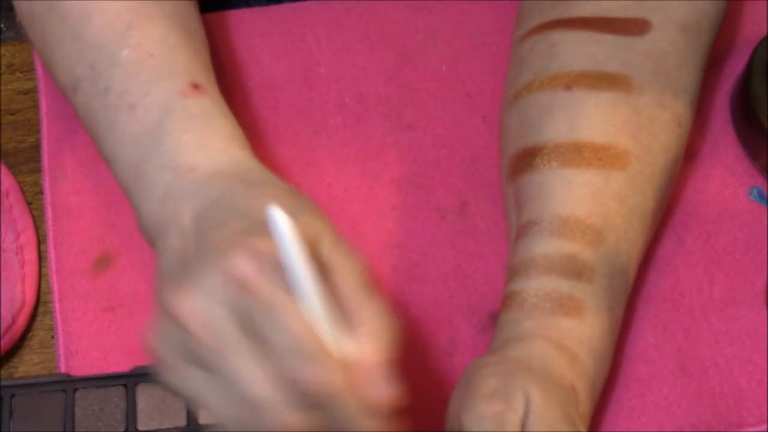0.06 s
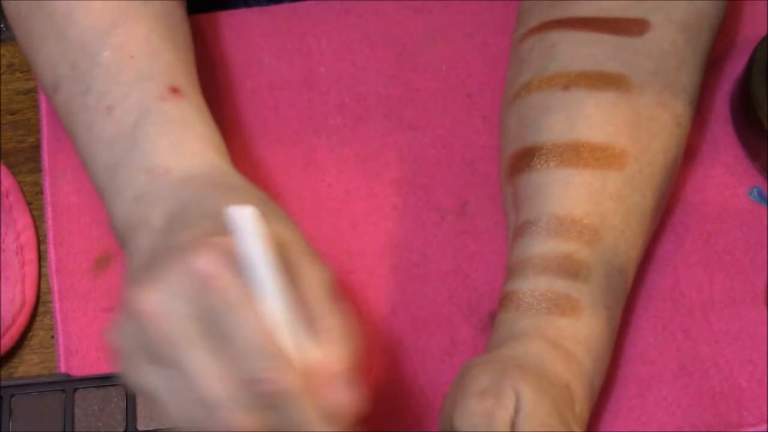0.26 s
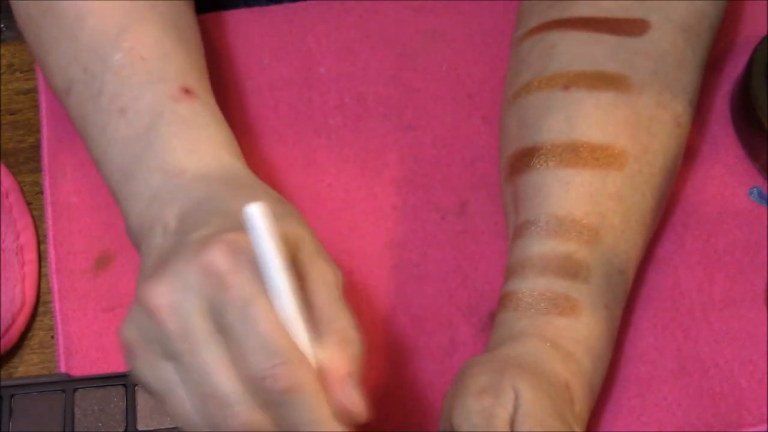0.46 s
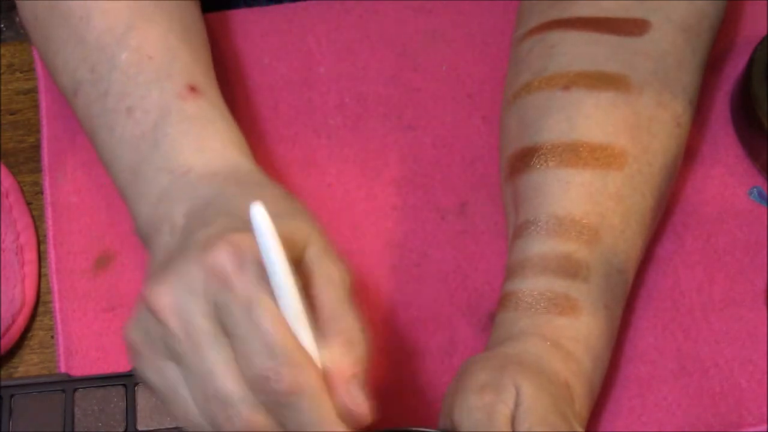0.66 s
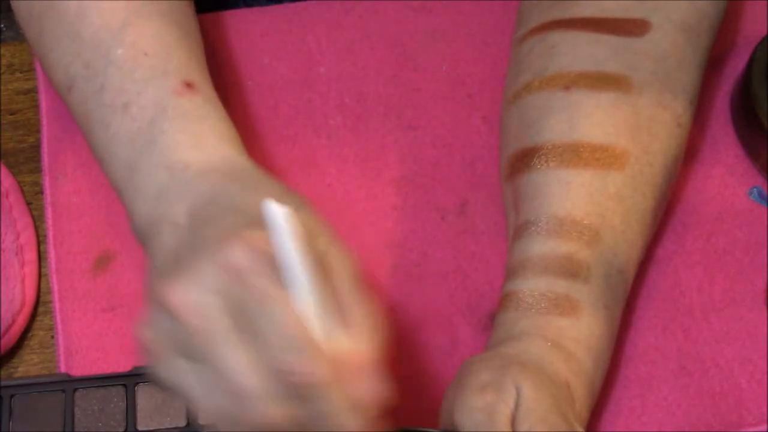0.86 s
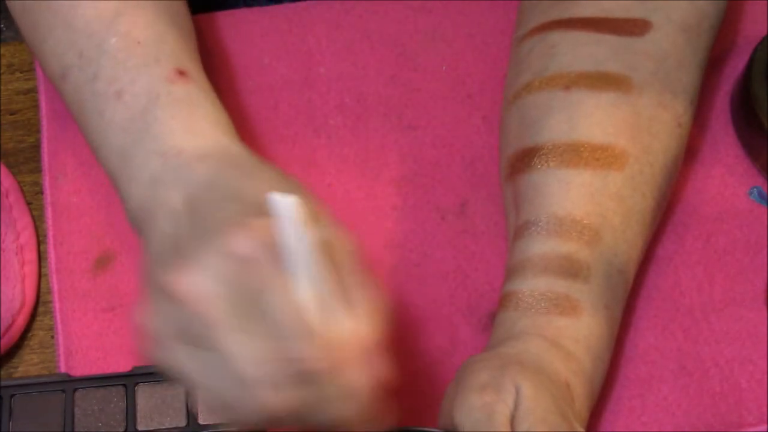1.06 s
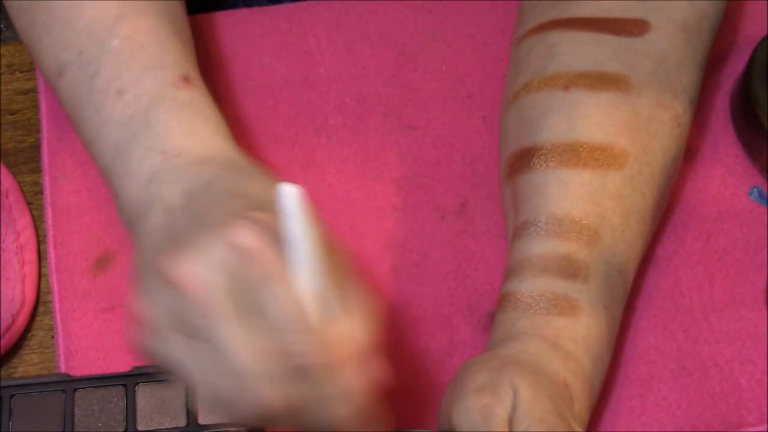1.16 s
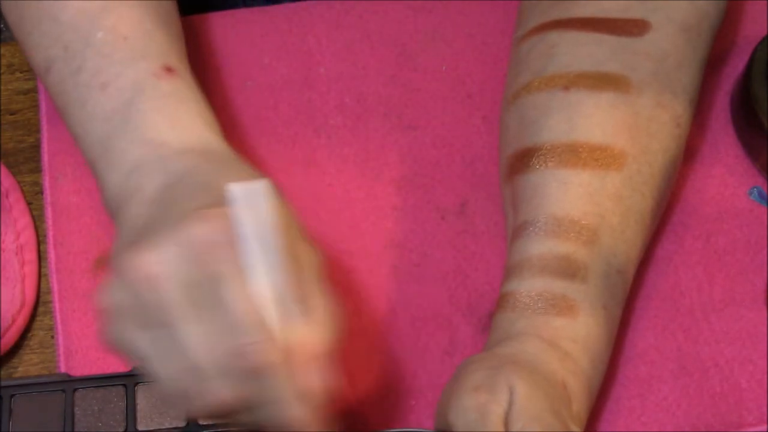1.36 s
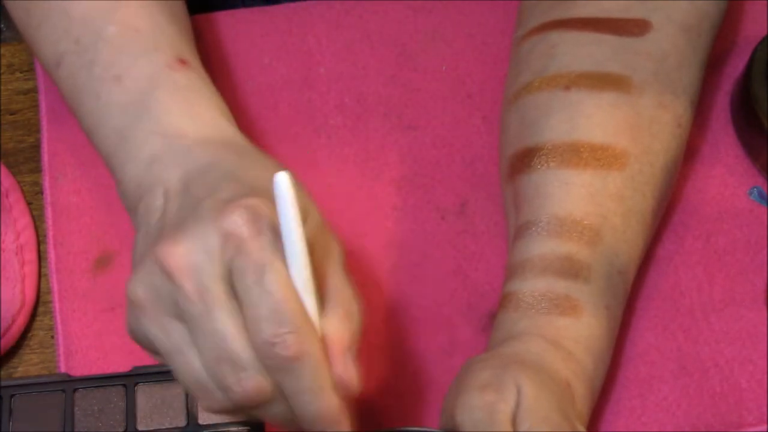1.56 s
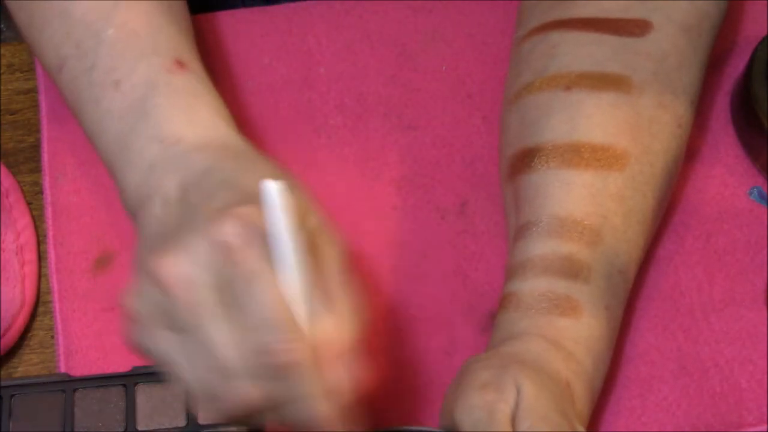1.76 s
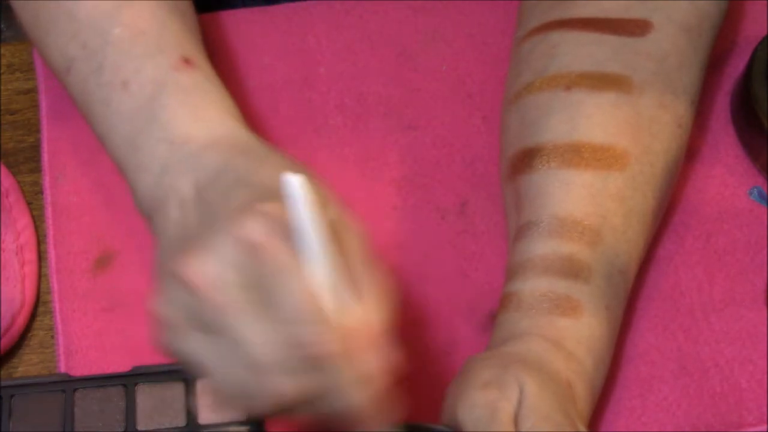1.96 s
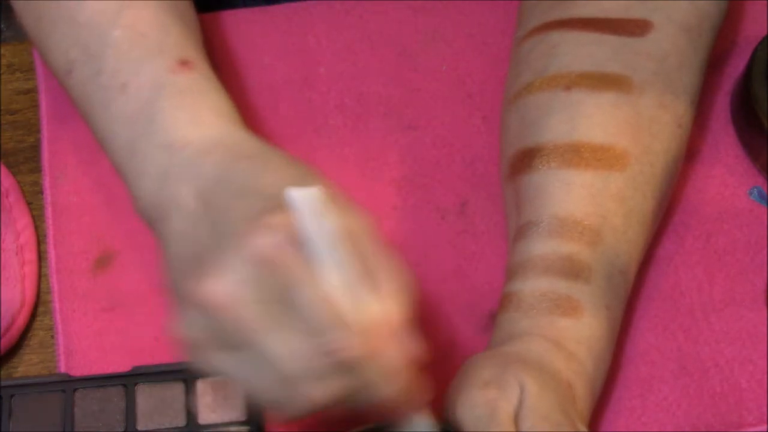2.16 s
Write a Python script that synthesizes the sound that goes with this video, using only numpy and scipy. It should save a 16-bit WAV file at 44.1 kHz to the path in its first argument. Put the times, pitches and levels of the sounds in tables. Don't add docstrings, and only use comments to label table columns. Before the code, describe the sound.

Close up, steady rapid brush swishes, about nine a second, are broken by several short, hard knocks on a plastic palette; a fridge-like hum and faint fan sit behind in a small, fairly dry room.

```python
import sys
import numpy as np
from scipy import signal
from scipy.fft import rfft, irfft
from scipy.io import wavfile
from scipy.ndimage import uniform_filter1d

SR = 44100
rng = np.random.default_rng(int(sys.argv[2]) if len(sys.argv) > 2 else 0)


def gain_from_db(level_db):
    decades = np.asarray(level_db, float) / 20
    return 10 ** decades


def to_wav(s):
    ch = np.atleast_2d(s).T
    pcm = np.round(np.clip(ch, -1, 1) * 32767)
    wavfile.write(sys.argv[1], SR, pcm.astype(np.int16))


N = 97020
LEAD_S = 0.1

# pitch [Hz], level [dB rms], pitch waver [Hz].
HUM_TONES = [(120.1, -46.5, .05), (132.4, -54, .1), (146.6, -63, .6), (185.5, -63, .6), (240, -59, .1)]
# pitch [Hz], width [Hz], level [dB rms].
FAN_TONES = [(212.3, 8.9, -56), (401.1, 18.8, -57.5), (575.4, 30, -60.5), (725, 88, -57)]
# frequency [Hz], density [dB per Hz].
AIR_RUMBLE = [(15, -43), (50, -41), (70, -7), (105, 4), (230, 7), (330, 1), (750, -3), (1200, -42)]
# frequency [Hz], density [dB per Hz].
AIR_HISS = [(600, -0.5), (1100, 2), (1800, -6.5), (3000, -9.5), (5000, -17), (8000, -20), (15500, -28),
            (15900, -80)]
# frequency [Hz], left-right likeness [0-1].
AIR_LIKENESS = [(30, .93), (100, .999), (170, 1), (300, 0.92), (600, 0.93), (1650, 0.9), (4500, 0.78),
                (7500, .995)]
# frequency [Hz], t60 [s].
ROOM_DECAY = [(700, .25), (1500, 0.15), (3000, 0.18), (5000, 0.17), (8000, 0.08), (14000, 0.33)]
# frequency [Hz], level [dB].
ROOM_COLOUR = [(1300, -1), (2500, 5.5), (3500, 3), (4700, 2.5), (6300, 5), (8000, 9), (11000, -7.5),
               (15500, -23)]
# time [s], strength [dB].
EARLIER_KNOCK = (-0.025, -7)
# peak time [s], strength [dB], swell [s], hollow rub against hiss [dB].
SWEEPS = [(0.088, -48, 0.023, 1), (0.206, -51.5, 0.021, -0.5), (0.316, -48, 0.032, 0.5),
          (0.434, -52, 0.02, 2), (0.538, -47.5, 0.023, -1.5), (.66, -52, 0.028, -4), (0.763, -48, 0.025, 0),
          (0.883, -50, 0.031, -1.5), (0.983, -48.5, 0.025, 2), (1.092, -50, 0.03, -2),
          (1.221, -50, 0.051, -1), (1.315, -54.5, 0.021, -14), (1.427, -46.5, 0.017, -1),
          (1.559, -53, 0.027, -4.5), (1.657, -49, 0.02, 0.5), (1.783, -52.5, 0.059, 0.5),
          (1.878, -49.5, 0.025, -2.5), (1.981, -52, 0.018, 3), (2.087, -47, 0.018, 1.5),
          (2.2, -56.5, 0.024, 2)]
# frequency [Hz], density [dB per Hz].
BRISTLE_HISS = [(1100, -18), (1900, -2.5), (4100, -9), (5500, -12.5), (7500, -9.5), (10000, -13),
                (15500, -25.5), (15900, -63)]
# pitch [Hz], width [Hz], level [dB].
BRISTLE_RESONANCES = [(7400, 500, -20), (9300, 600, -20), (4300, 600, -22)]
# start [s], strength [dB], spot [0 broad face - 1 rim],
# brightness [dB per octave], free ring before the hand damps it [s].
KNOCKS = [
    (0.2208, 2, 0.28, 0.5, 0.002),
    (0.6754, -1.5, 0, -0.5, 0.0018),
    (1.3298, 0, 0.25, 1.5, 0.0021),
    (1.4490, 1.5, 1, 2, 0.0014),
    (1.6755, 2, 1, 3, 0.00205),
    (1.8992, -11.5, 0.86, -2, 0.0014),
]
# pitch [Hz], level struck on the face [dB], level struck on the rim [dB], t60 [s].
PALETTE_MODES = [(864, -41, -39, 0.0027), (1342, -2, -5.5, 0.02), (1554, -2.5, -10, 0.016),
                 (2180, -1.5, 2.5, 0.016), (2654, -7, 2.5, 0.013), (2928, -1.5, -0.5, 0.0086),
                 (4193, -7.5, 0.5, 0.012), (4636, -3, 2, 0.011), (5394, -1, -6, 0.0096),
                 (6200, -5.5, -17, 0.005), (7140, -10.5, -6.5, 0.011), (8760, -8, -5.5, 0.0052),
                 (9590, -16, -16.5, 0.018), (10580, -20, -14, 0.0094)]
# delay [s], level [dB].
REFLECTIONS = [(.0045, -24), (.0075, -12), (.0105, -12), (.013, -17), (.017, -18)]


def evened(x):
    return x / np.sqrt(np.mean(x ** 2) + 1e-20)


def read(points, hz):
    f, value = np.transpose(points)
    return np.interp(np.log(hz + 1), np.log(f + 1), value)


def coloured(x, points):
    gain = gain_from_db(read(points, np.fft.rfftfreq(len(x), 1 / SR)))
    return evened(irfft(rfft(x) * gain, len(x)))


def resonate(x, hz, width_hz):
    r = np.exp(-np.pi * width_hz / SR)
    return 2 * signal.lfilter([1 - r], [1, -r * np.exp(2j * np.pi * hz / SR)], x).real


def resonate_twice(x, hz, width_hz):
    return resonate(resonate(x, hz, width_hz), hz, 2 * width_hz)


def add(mix, s, sound):
    part = mix[round(s * SR):][:len(sound)]
    part += sound[:len(part)]


def hum():
    drift = evened(uniform_filter1d(rng.standard_normal((len(HUM_TONES), N)), 2500, axis=1))
    out = np.zeros(N)
    for (hz, db, waver_hz), wander in zip(HUM_TONES, drift):
        cycles = rng.random() + np.cumsum(hz + waver_hz * wander) / SR
        out += np.sqrt(2) * gain_from_db(db) * np.sin(2 * np.pi * cycles)
    return out


def fan():
    out = np.zeros(N)
    for hz, width_hz, db in FAN_TONES:
        out += gain_from_db(db) * evened(resonate_twice(rng.standard_normal(N), hz, width_hz))
    return out


def air():
    rumble_db, hiss_db = -49.5, -53.5
    middle, other = (gain_from_db(rumble_db) * coloured(low, AIR_RUMBLE) + gain_from_db(hiss_db) * coloured(high, AIR_HISS)
                     for low, high in rng.standard_normal((2, 2, N)))
    same = np.clip(read(AIR_LIKENESS, np.fft.rfftfreq(N, 1 / SR)), 0, 1)
    side = irfft(rfft(other) * np.sqrt((1 - same) / (1 + same)), N)
    return np.array([middle + side, middle - side])


def room(x):
    start_s, wide = 0.0011, 0.13
    taps = np.zeros((2, 22000))
    at = np.arange(0, 21980, 20) + rng.integers(0, 20, (2, 1099))
    np.put_along_axis(taps, at, rng.choice([-1., 1.], at.shape), 1)
    hz, t, bands = signal.stft(taps, SR, nperseg=128)
    decay_db = read(ROOM_COLOUR, hz)[:, None] - 60 * t / read(ROOM_DECAY, hz)[:, None]
    tail = signal.istft(bands * gain_from_db(decay_db), SR, nperseg=128)[1]
    u = np.arange(tail.shape[1]) / SR
    tail = tail * np.clip(u / start_s - 0.5, 0, 1)
    tail = tail[0] + wide * np.array([[1], [-1]]) * tail[1]
    tail = tail / np.linalg.norm(tail[0])
    return signal.fftconvolve(x[None], tail, axes=1)[:, :len(x)]


def brush(length):
    lift_s, flicker_db = 0.02, 1.0
    grit_per_s, grit_spread_db, grit_db = 4300, 4.5, 3
    hollow_hz, hollow_width_hz, hollow_level_db = 1340, 490, -1
    t = np.arange(length) / SR - LEAD_S
    hiss_power, rub_power = np.zeros(length), np.zeros(length)
    for s, db, swell_s, hollow_db in SWEEPS:
        shape = np.exp(-((t - s) / np.where(t < s, swell_s, lift_s)) ** 2)
        hiss_power += gain_from_db(2 * db) * shape
        rub_power += gain_from_db(2 * (db + hollow_db)) * shape

    grit = gain_from_db(grit_spread_db * np.minimum(rng.exponential(1, length), 4))
    grit = grit * (rng.random(length) < grit_per_s / SR) * rng.choice([-1., 1.], length)
    drive = rng.standard_normal(length) + gain_from_db(grit_db) * evened(grit)

    sheen = sum(gain_from_db(db) * evened(resonate(drive, hz, w)) for hz, w, db in BRISTLE_RESONANCES)
    hiss = evened(coloured(drive, BRISTLE_HISS) + sheen)
    rub = gain_from_db(hollow_level_db) * evened(resonate_twice(drive, hollow_hz, hollow_width_hz))
    flicker = gain_from_db(flicker_db * evened(uniform_filter1d(rng.standard_normal((2, length)), 500, axis=1)))
    return flicker[0] * np.sqrt(hiss_power) * hiss + flicker[1] * np.sqrt(rub_power) * rub


def knock(spot, bright_db, free_s):
    rattle, rattle_s, rattle_per_s = 0.053, 0.00013, 5000
    fizz_db, fizz_t60_s, fizz_hz, fizz_width_hz = -6.5, 0.006, 12500, 4500
    crack_db, scatter_db, detune, low_lag_s = -27.5, 0.55, 0.008, 0.0004
    damped_t60_s, thin_hz = 0.008, 584
    blunt_s, blunt_t60_s = 0.0003, 0.0025
    t, spot = np.arange(1000) / SR, np.clip(spot, 0, 1)
    draw = rng.standard_normal((4, 1000))
    hits = rattle * draw[0] * (rng.random(1000) < rattle_per_s / SR) * np.exp(-(t / rattle_s) ** 2)
    hits[0] = 1

    fizz = resonate(draw[3], fizz_hz, fizz_width_hz)
    ring = gain_from_db(fizz_db + 2 * bright_db - 60 * t / fizz_t60_s) * fizz
    for k, (hz, face_db, rim_db, t60) in enumerate(PALETTE_MODES):
        db = face_db + spot * (rim_db - face_db) + bright_db * np.log2(hz / 2500) + scatter_db * draw[1, k]
        rise = 1 - np.exp(-t / (low_lag_s * 1300 / hz))
        tone = np.sin(2 * np.pi * hz * (1 + detune * draw[2, k]) * t)
        ring += gain_from_db(db - 60 * t / t60) * rise * tone
    ring[:3] += gain_from_db(crack_db + 2 * bright_db) * np.array([-1, 2, -1])

    near = signal.fftconvolve(hits, ring)[:1000]
    near = near * gain_from_db(-60 * np.maximum(t - free_s, 0) / damped_t60_s)
    blunt = ring * gain_from_db(-60 * np.maximum(t - blunt_s, 0) / blunt_t60_s)
    blunt = blunt * np.linalg.norm(near) / np.linalg.norm(blunt)
    pair = np.array([near, blunt]) / abs(near).max()
    return signal.sosfilt(signal.butter(3, thin_hz, "highpass", fs=SR, output="sos"), pair).T


def echoes(x):
    out = np.zeros(len(x))
    for s, db in REFLECTIONS:
        add(out, s, gain_from_db(db) * x)
    return resonate_twice(out, 2920, 1100)


def soft_tap(length):
    start_s, hz, db, rise_s, t60_s = 1.1078, 1480, -25.5, 0.0012, 0.025
    t = np.maximum(np.arange(length) / SR - LEAD_S - start_s, 0)
    return gain_from_db(db - 60 * t / t60_s) * np.minimum(t / rise_s, 1) * np.sin(2 * np.pi * hz * t)


def scene():
    port_db, knock_room_db, sweep_room_db = -27, -13.5, -15
    lead = round(LEAD_S * SR)
    knocks = np.zeros((N + lead, 2)) + soft_tap(N + lead)[:, None]
    earlier_s, earlier_db = EARLIER_KNOCK
    add(knocks, LEAD_S + earlier_s, gain_from_db(earlier_db) * knock(0.5, -2.2, 0.0037))
    for s, db, spot, bright_db, free_s in KNOCKS:
        add(knocks, LEAD_S + s, gain_from_db(db) * knock(spot, bright_db, free_s))
    struck, wall_bound = knocks.T
    sweeps = brush(N + lead)
    near = struck + echoes(wall_bound) + sweeps

    ports = np.convolve(rng.standard_normal(24), [1, 1])
    side = gain_from_db(port_db) * signal.lfilter(ports / np.linalg.norm(ports), 1, near)
    wet = room(gain_from_db(knock_room_db) * wall_bound + gain_from_db(sweep_room_db) * sweeps)
    close = np.array([near + side, near - side]) + wet
    return close[:, lead:] + hum() + fan() + air()


def top_cut(x):
    return signal.sosfilt(signal.butter(12, 16860, fs=SR, output="sos"), x)


def record(dry):
    lean_db, limit, rumble_hz, edge_hz = -0.3, 1.4, 40, 16000
    x = limit * np.tanh(dry * gain_from_db([[lean_db / 2], [-lean_db / 2]]) / limit)
    x = signal.sosfilt(signal.butter(2, rumble_hz, "highpass", fs=SR, output="sos"), x)
    edge = signal.firwin(121, edge_hz, window=("kaiser", 3), fs=SR)
    x = signal.oaconvolve(x, edge[None], "same")
    return top_cut(x)


dry = scene()
out = record(dry)
to_wav(out)
```